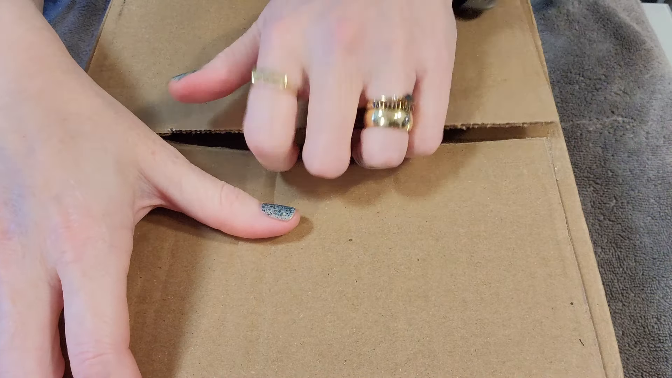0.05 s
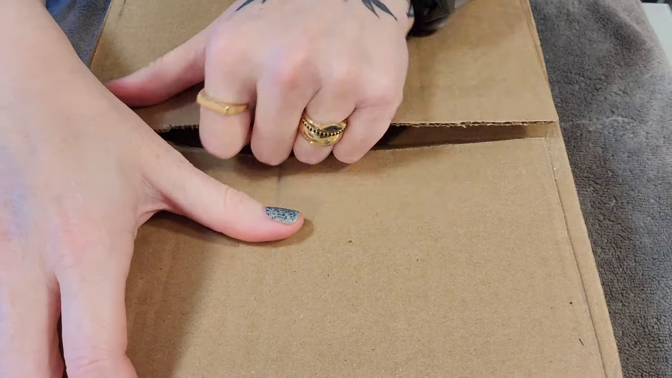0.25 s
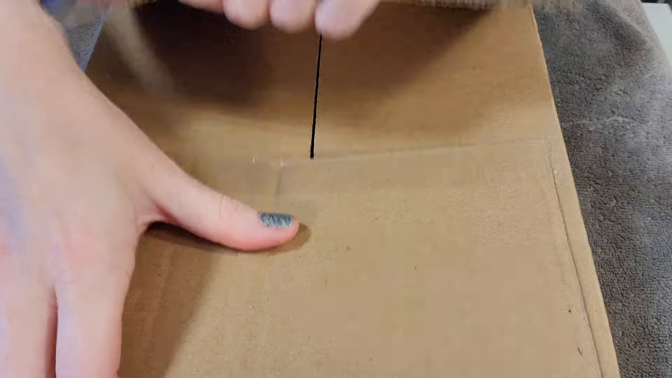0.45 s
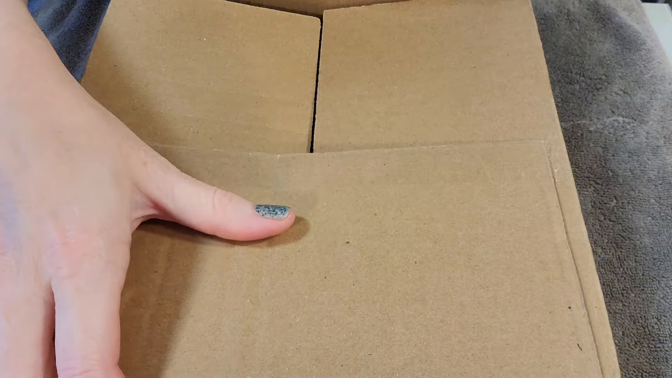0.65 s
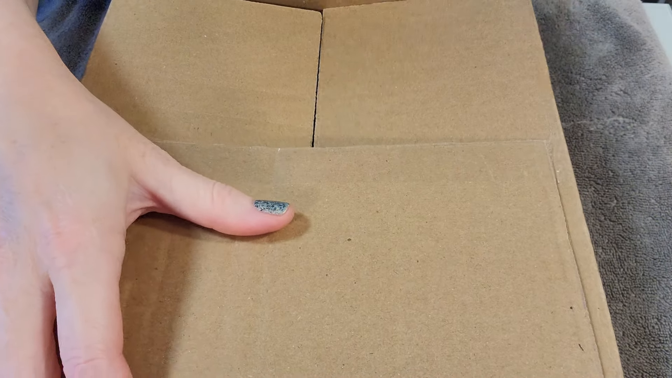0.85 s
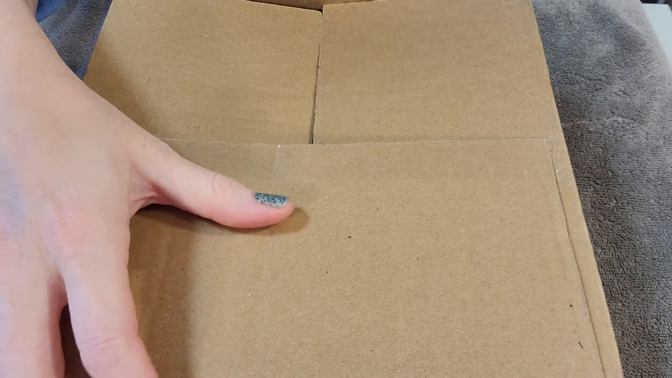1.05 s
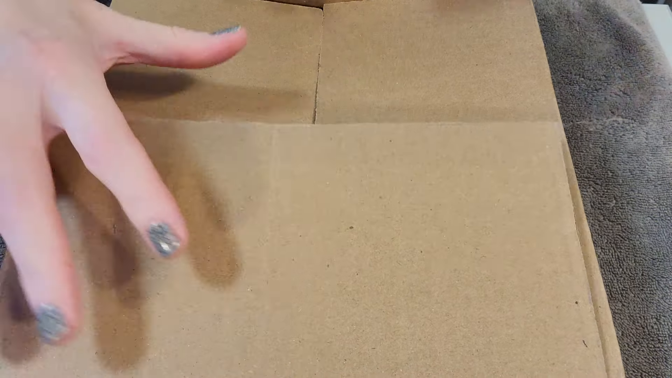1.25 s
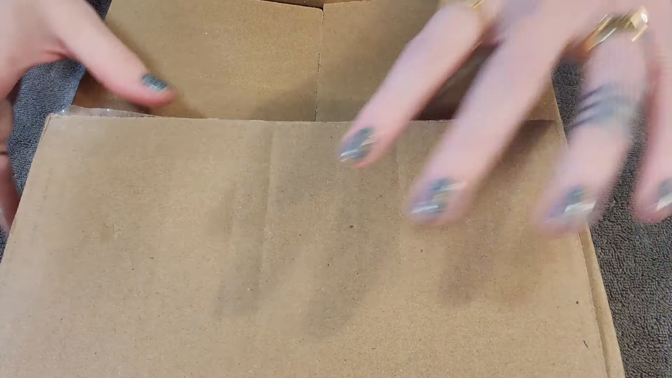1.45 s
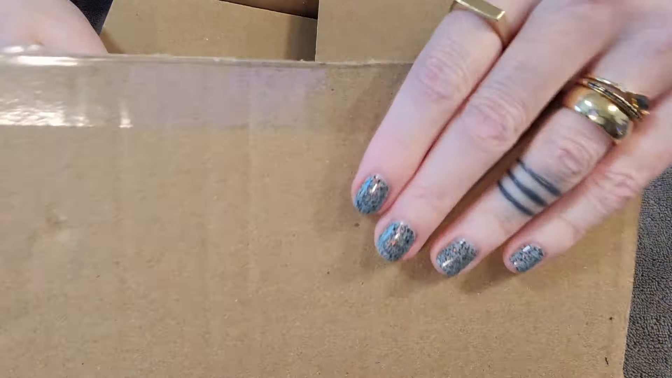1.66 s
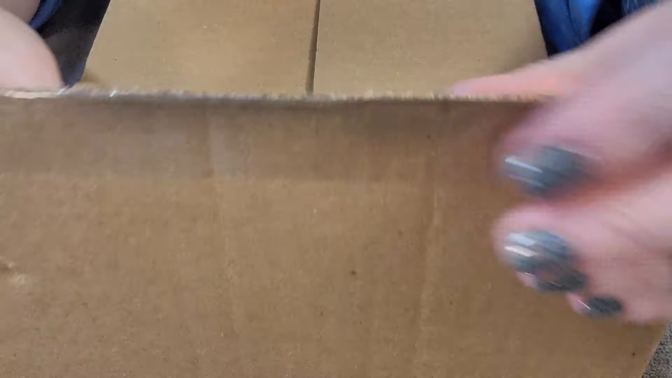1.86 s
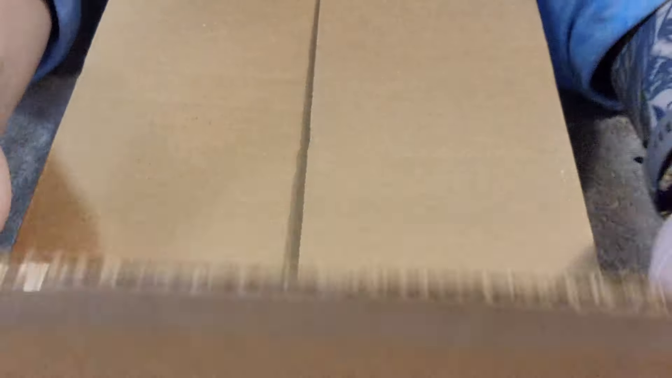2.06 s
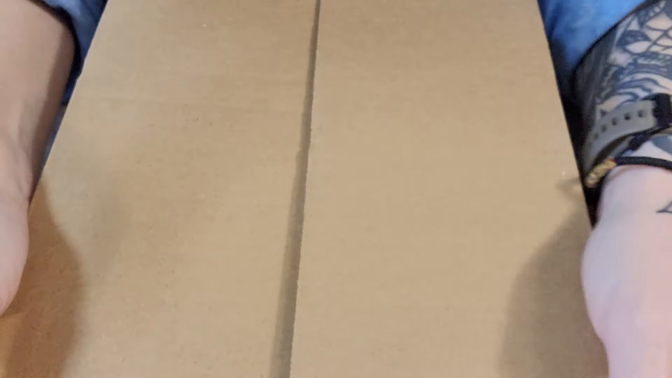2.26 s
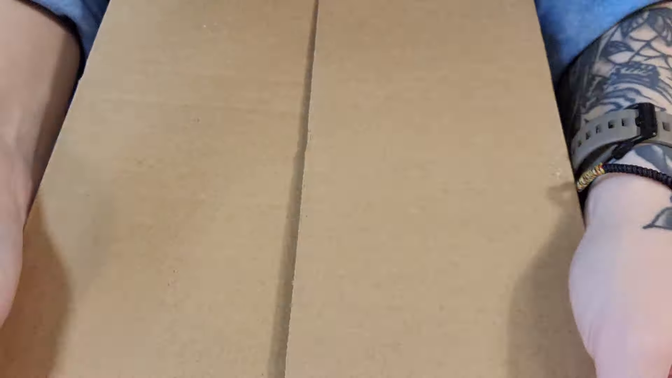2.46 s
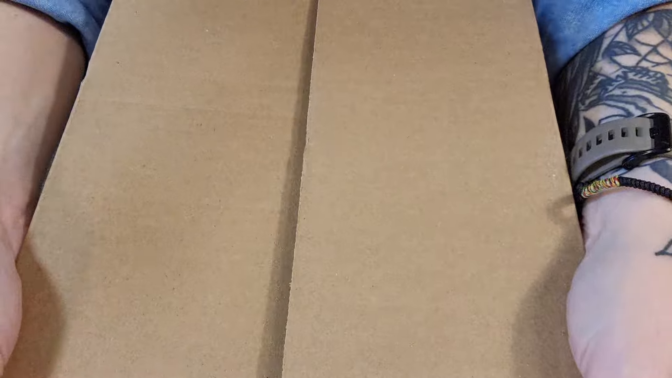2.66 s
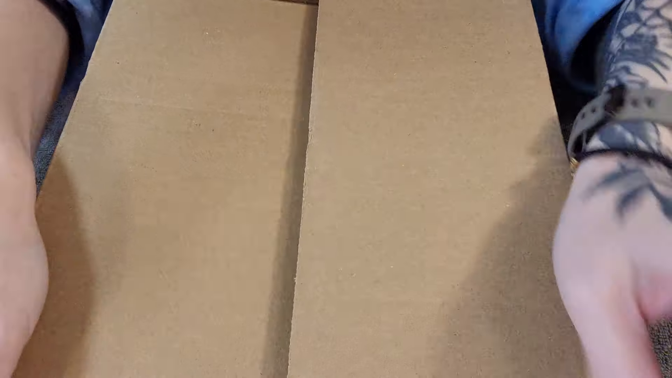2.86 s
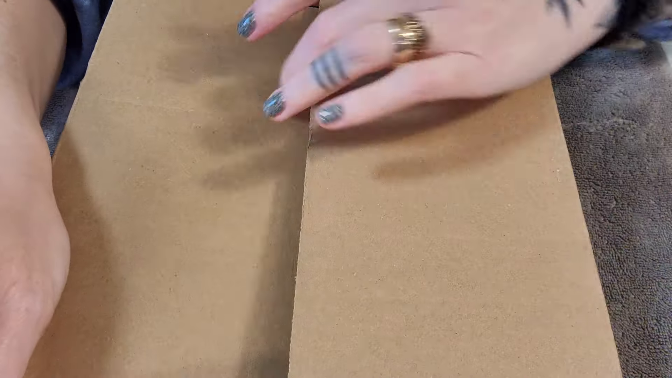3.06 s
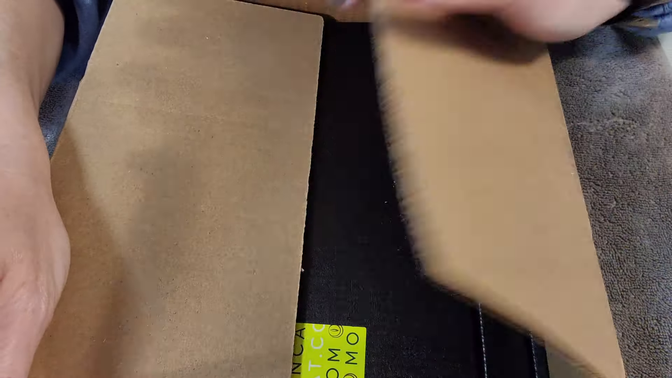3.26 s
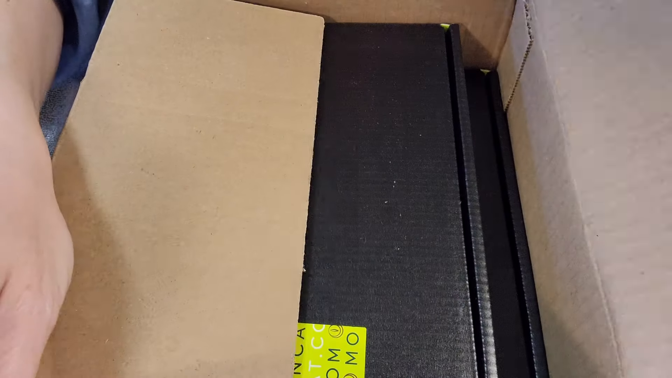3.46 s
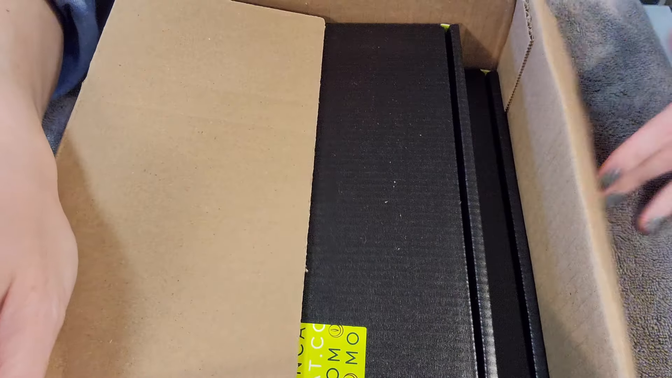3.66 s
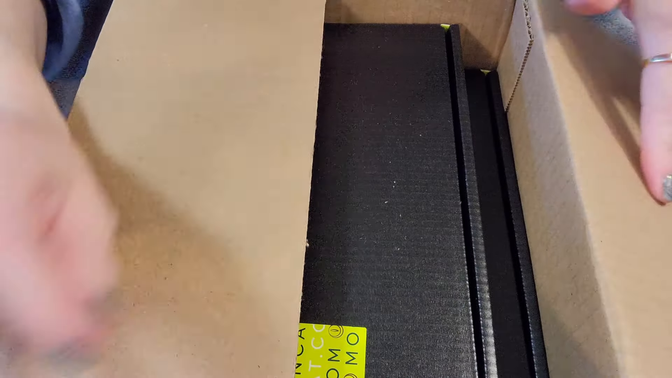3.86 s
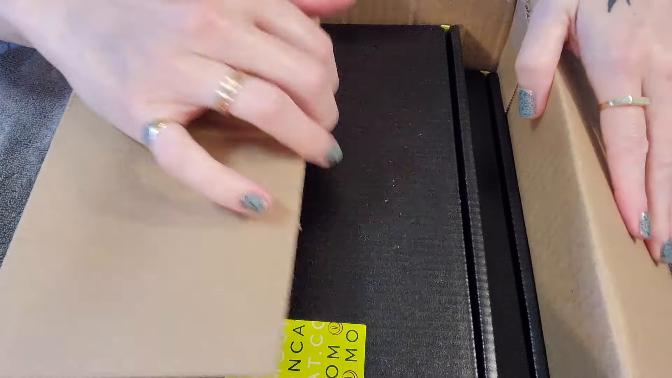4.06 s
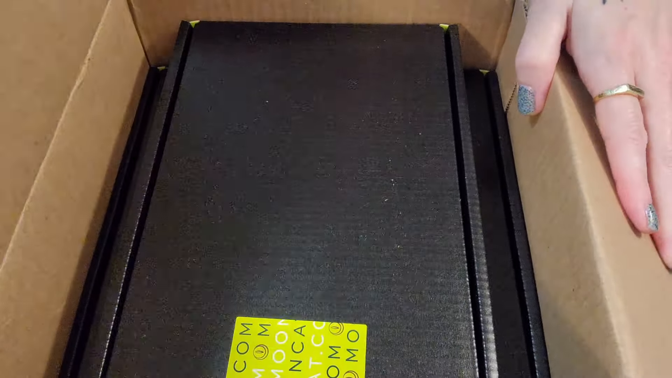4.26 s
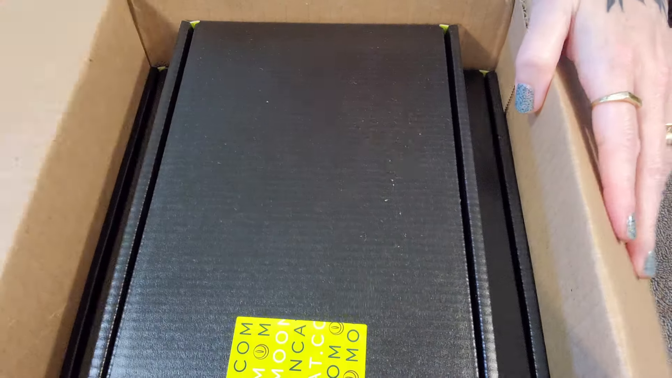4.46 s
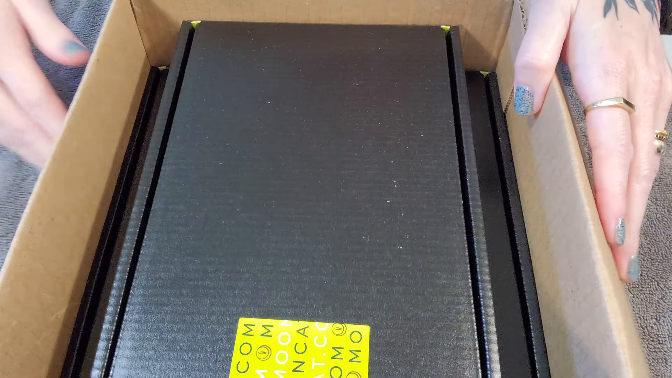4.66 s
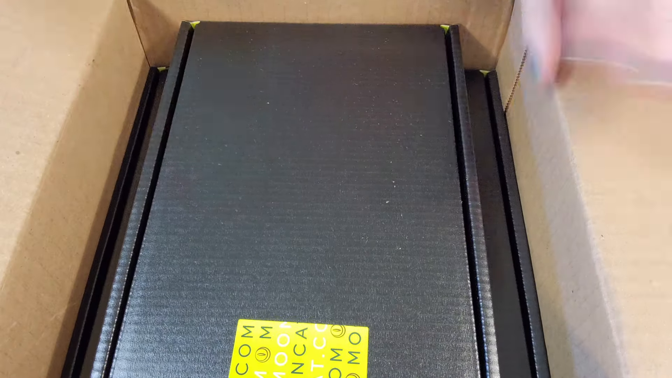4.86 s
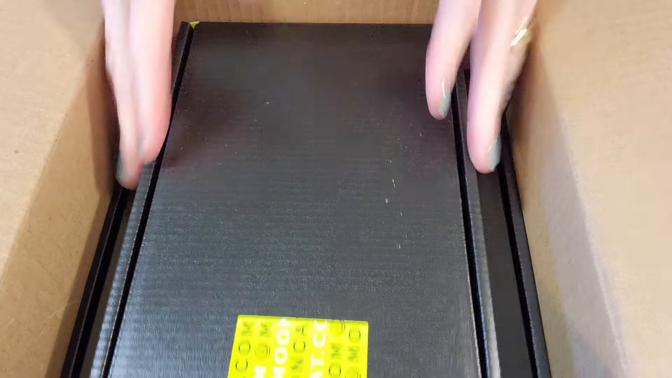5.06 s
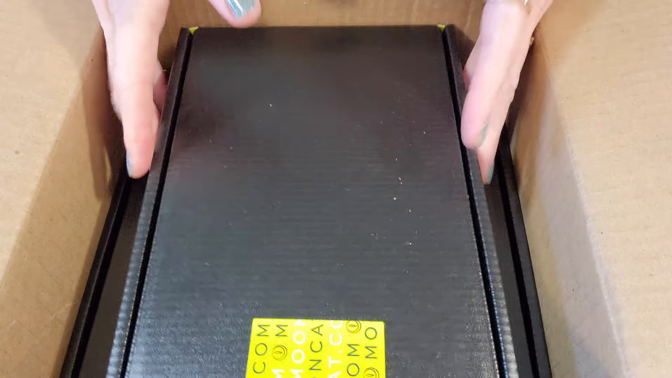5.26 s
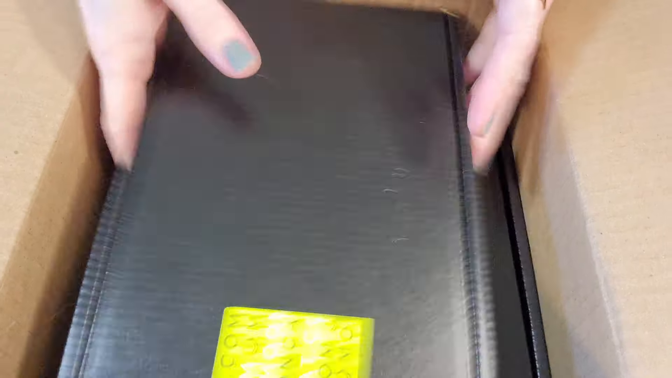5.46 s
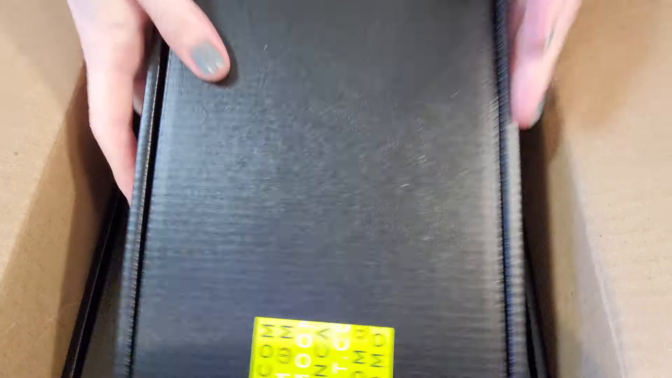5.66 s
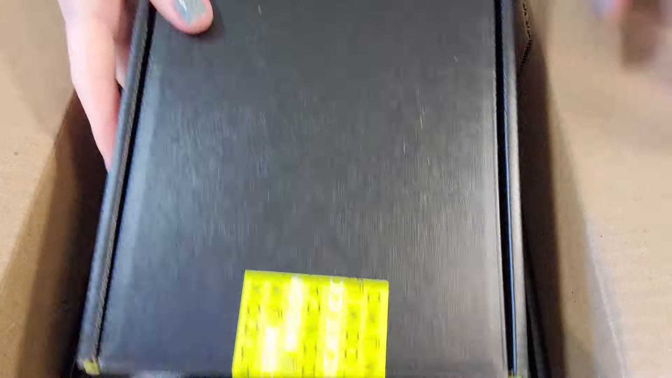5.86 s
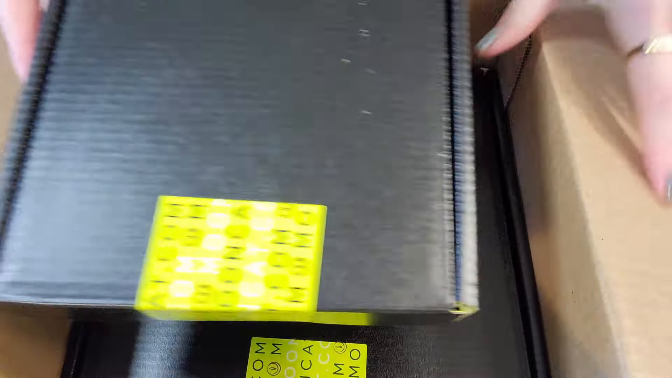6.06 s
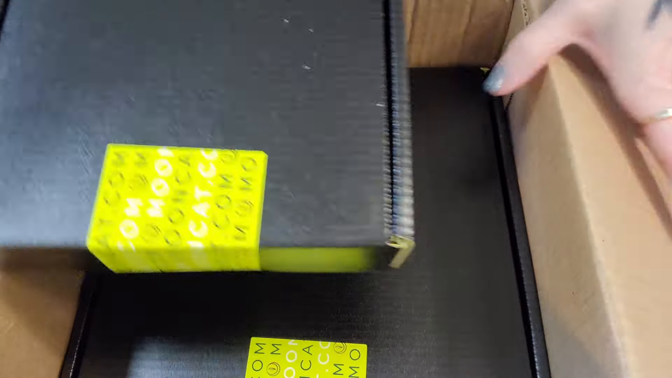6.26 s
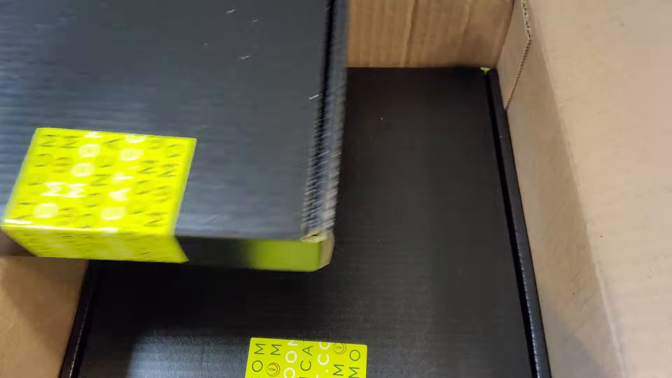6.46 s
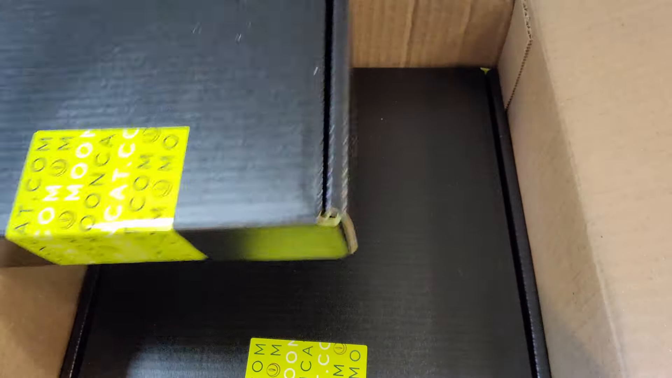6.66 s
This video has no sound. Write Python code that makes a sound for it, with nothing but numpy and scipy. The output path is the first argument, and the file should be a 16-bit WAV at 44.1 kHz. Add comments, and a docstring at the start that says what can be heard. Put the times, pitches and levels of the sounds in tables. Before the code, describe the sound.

Hands open a corrugated cardboard box close to the microphone in a small room. After a light knock, a sharp fibrous rip bursts out early, followed by two hollow thumps. Flaps hiss, rub and snap, fingertips squeak faintly, then dull knocks and scrapes grow busier until a smaller box bumps low and judders as it is drawn out.

```python
"""In a small room, hands open a corrugated cardboard box close to the microphone.
The lid rips free in bursts of parting fibres; panels flex, knock and snap as damped resonances.
Palms and paper rub by stick-slip friction, fingertips squeak, smooth faces hiss past,
and a smaller inner box is bumped and juddered out over the rim.
The held box rumbles below, and diffuse reflections surround everything but that rumble."""
import sys
import numpy as np
from scipy import signal
from scipy.fft import rfft, irfft
from scipy.io import wavfile
from scipy.ndimage import uniform_filter1d, map_coordinates

SR = 44100
rng = np.random.default_rng(int(sys.argv[2]) if len(sys.argv) > 2 else 0)


def generate_wav(signal):
    """Clip the signal to [-1, 1] and save it as 16-bit WAV at the path in sys.argv[1]."""
    frames = np.transpose(np.atleast_2d(signal))
    scaled = np.clip(frames, -1, 1) * 32767
    pcm = np.round(scaled).astype(np.int16)
    wavfile.write(sys.argv[1], SR, pcm)


N = 295470
T = np.arange(N) / SR  # time in seconds


def undb(db):
    """Logarithmic level: decibels to amplitude gain."""
    return 10 ** (np.asarray(db) / 20)


def unit(x):
    """Normalization: scale to rms 1."""
    return x / np.sqrt(np.mean(x ** 2))


def together(gains):
    """Incoherent addition: unrelated movements add in power."""
    return np.sqrt(sum(g ** 2 for g in gains))


def add(out, s, x):
    """Superposition: mix x into out from s seconds on."""
    i = int(s * SR)
    out[i:i + len(x)] += x[:N - i]


def colour(x, points):
    """Spectral shaping: filter x by (Hz, relative dB) points, then scale to rms 1."""
    hz, db = np.transpose(points)
    f = np.maximum(np.fft.rfftfreq(len(x), 1 / SR), 1)
    gain = undb(np.interp(np.log(f), np.log(hz), db))
    return unit(irfft(rfft(x) * gain, len(x)))


def band(x, hz, width):
    """Simple resonance: a second-order peak with gain 1 at its centre."""
    hz = min(hz, SR * .45)
    b, a = signal.iirpeak(hz, hz / min(width, SR / 4), fs=SR)
    return signal.lfilter(b, a, x)


def ring(x, modes):
    """Modal superposition: x drives parallel resonances, each (Hz, width Hz, dB)."""
    return sum(undb(db) * band(x, hz, width) for hz, width, db in modes)


def dull(x, hz):
    """Contact smoothing: a broad, soft contact passes little above hz."""
    return signal.sosfilt(signal.butter(2, hz, fs=SR, output="sos"), x)


def walk(rate):
    """Random modulation: straight lines between about rate chance values a second, rms near 1."""
    k = int(SR / rate)
    steps = np.repeat(rng.standard_normal(N // k + 1), k)
    return unit(uniform_filter1d(steps, k))[:N]


def fibres(rate, spread_db):
    """Stick-slip: paper fibres catch and let go in about rate slips a second, a few larger."""
    size = undb(spread_db * np.minimum(rng.exponential(size=N), 4))
    slipping = rng.random(N) < rate / SR
    return unit(slipping * size * rng.choice([-1, 1], N))


def fade(t, t60):
    """Exponential decay: free decay by 60 dB in t60."""
    return np.exp(-np.log(1000) * t / t60)


def gesture(start, rise, hold, t60):
    """Movement envelope: linear attack, hold and free decay, all in seconds."""
    t = T - start
    return np.clip(t / rise, 0, 1) * fade(np.maximum(t - rise - hold, 0), t60)


def swell(middle, half):
    """Stroke envelope: a short rise and fall with a broad top and quick edges."""
    return np.exp(-np.minimum(np.abs((T - middle) / half) ** 2.5, 20))


def snap(hz, q, crush_t60, crush):
    """Impact excitation: a contact and decaying crushing noise through a broad resonance; peak 1."""
    t = T[:SR // 10]
    push = crush * rng.standard_normal(len(t)) * fade(t, crush_t60)
    push[0] += 1  # the contact itself
    x = band(band(push, hz, hz / q), hz, 2 * hz)
    return x / np.abs(x).max()


def flex(hz):
    """Damped bending: corrugated board is dead, so each mode lasts only a few cycles."""
    turns = hz * T[:SR // 5]
    modes = [(1, 1), (1.7, -.5)]  # frequency ratio, gain
    return sum(gain * np.sin(2 * np.pi * ratio * turns) * fade(ratio * turns, 8) for ratio, gain in modes)


# The lid tearing free: a first crack, a thin peel, the glue giving way, the main run.
# Each row: start in seconds, hold in seconds, die-away t60 in seconds, level in dB, treble tilt in dB.
LID_RIPS = [(0.374, 0.00074, 0.022, -18, 8.5), (0.382, 0.038, .05, -44.5, 12.5),
            (0.4361, 0.0017, 0.009, -19.5, 8), (0.4416, 0.012, 0.27, -16, 1)]
# Colour of the tearing fibres. Each row: frequency in Hz, relative level in dB.
TEAR_COLOUR = [(90, -17.5), (400, -3.5), (1000, -2.5), (1900, -10), (2500, -18), (6300, -19), (16000, -37)]
# Resonances of the outer box. Each row: frequency in Hz, width in Hz, gain in dB.
OUTER_MODES = [(564, 8.7, 10.5), (980, 11, -14), (1415, 12, 2), (1850, 34, 5), (3880, 33, 0),
               (5740, 208, -12)]
RIP_RISE_S = 0.00037


def rip():
    """Fracture: glued fibres part in fast runs, bright at first, then shaking the whole lid."""
    run = fibres(rate=6000, spread_db=4.0)
    run = colour(run + undb(-4.5) * ring(run, OUTER_MODES), TEAR_COLOUR)
    low = signal.sosfiltfilt(signal.butter(2, 2200, fs=SR, output="sos"), run)
    high = run - low
    tear = np.zeros(N)
    for s, hold, t60, db, tilt_db in LID_RIPS:
        tilted = low * undb(-tilt_db) + high * undb(tilt_db)
        tear += gesture(s, RIP_RISE_S, hold, t60) * undb(db) * tilted
    return tear


# Blows on the panels. Each row: start in seconds, flex frequency in Hz, flex level in dB,
# slap frequency in Hz, slap level in dB before dulling, edge click level in dB.
PANEL_BLOWS = [(0.0194, 246, -15.5, 1070, -21.5, -18.5), (0.716, 337, -12.5, 575, -25, -42),
               (0.724, 410, -9.5, 880, -21.5, -50), (1.18, 328, -31, 640, -22.5, -32),
               (1.581, 165, -26.5, 1250, -26, -22.5), (1.588, 187, -16, 1020, -14, -23),
               (1.868, 227, -24, 1170, -29.5, -34), (2.585, 195, -30, 550, -27, -47),
               (2.637, 153, -25, 520, -28, -37), (2.6652, 179, -24, 580, -18, -24),
               (2.763, 179, -26, 660, -32.5, -43), (2.989, 304, -26, 570, -25, -36.5),
               (3.1247, 242, -16, 942.5, -22.5, -27.5), (3.1893, 362, -10.5, 1010, -18.5, -20),
               (3.899, 116, -29.5, 796, -18, -26), (4.053, 160, -18.5, 900, -29.5, -29),
               (4.063, 198, -15, 670, -30, -23), (4.3465, 84, -22, 484, -18, -16),
               (4.655, 218, -17.5, 396, -26, -31), (5.107, 525, -15.5, 1060, -9.5, -15),
               (5.248, 193, -33.5, 600, -27, -39), (5.319, 130, -25.5, 680, -27, -24.5),
               (5.511, 210, -16, 616, -20.5, -35), (5.534, 230, -15.5, 690, -9.5, -23),
               (5.651, 157, -31.5, 480, -29, -24.5), (5.801, 197, -26, 806, -25.5, -37)]


def knocks():
    """Impact: a blow flexes a panel, slaps its face and clicks its edge; returns flexing, contacts."""
    flexing, contacts = np.zeros(N), np.zeros(N)
    for s, flex_hz, flex_db, slap_hz, slap_db, click_db in PANEL_BLOWS:
        slap = dull(snap(slap_hz, q=2.15, crush_t60=0.069, crush=0.081), 2.7 * slap_hz)
        click = snap(hz=3650, q=0.9, crush_t60=0.0078, crush=0.18)
        add(flexing, s, undb(flex_db) * flex(flex_hz))
        add(contacts, s, undb(slap_db) * slap)
        add(contacts, s, undb(click_db) * click)
    return flexing, contacts


# Soft presses that only bend a panel.
# Each row: start in seconds, flex frequency in Hz, level in dB before the gradual onset.
PANEL_PRESSES = [(1.612, 177, -15.5), (2.069, 87, -29), (2.811, 217, -21), (3.106, 198, -20.5),
                 (3.197, 249, -11.5), (3.413, 80.6, -24), (4.35, 242, -11), (4.999, 110, -20),
                 (5.047, 79.6, -20.5), (5.517, 106, -16.5), (6.348, 73.5, -26.5)]
PRESS_BUILD_CYCLES = 0.59  # time constant of the onset


def presses():
    """Gradual forcing: a soft push takes about a cycle to get the panel moving."""
    out = np.zeros(N)
    for s, hz, db in PANEL_PRESSES:
        onset = 1 - np.exp(-hz * T[:SR // 5] / PRESS_BUILD_CYCLES)
        add(out, s, undb(db) * flex(hz) * onset)
    return out


# Nails and creases snapping. Each row: start in seconds, pitch in Hz, peak level in dB.
CREASE_TICKS = [(0.115, 8700, -26), (0.376, 4100, -17), (1.358, 1410, -37), (2.25, 9500, -33.5),
                (2.567, 1640, -33), (2.6564, 6800, -19), (2.6656, 2330, -15.5), (2.765, 2630, -31),
                (3.19, 6800, -19), (3.1941, 2450, -13.5), (3.1958, 2200, -17.5), (3.526, 5700, -29),
                (4.163, 8100, -26), (4.348, 1450, -13.5), (4.426, 2980, -21), (4.465, 1530, -28.5),
                (4.657, 7000, -18), (5.187, 2970, -25), (5.509, 3560, -22.5), (5.535, 2900, -17),
                (5.652, 2900, -23.5)]


def ticks():
    """Impulse response: small dry snaps of nails and creases, each with a short ring."""
    out = np.zeros(N)
    for s, hz, db in CREASE_TICKS:
        add(out, s, undb(db) * snap(hz, q=4.5, crush_t60=.014, crush=.4))
    return out


# Palms and flaps rubbing, one row a movement. Each row: start in seconds, speeding up in seconds,
# steady motion in seconds, board drive in dB, surface hiss drive in dB.
RUB_MOVES = [(0.014, 0.0044, 0.11, -38.5, -47.5), (0.211, 0.0067, 0.098, -60, -51),
             (0.93, 0.25, 0.087, -46.5, -59.5), (1.525, 0.012, 0.088, -46.5, -53),
             (1.732, 0.11, 0.04, -48.5, -48), (2.18, 0.092, 0.46, -50.5, -57),
             (2.499, 0.063, 0.32, -45.5, -50), (3.107, 0.065, 0.024, -45, -46.5),
             (3.521, 0.0037, 0.24, -54.5, -53), (3.95, 0.092, 0.22, -49.5, -53),
             (4.347, 0.02, 0.44, -49.5, -49.5), (4.64, 0.025, 0.1, -46.5, -51),
             (4.77, 0.11, 0.015, -50.5, -49), (5.095, 0.0075, 0.085, -40.5, -47),
             (5.25, 0.01, 0.29, -44.5, -51.5), (5.48, 0.022, 0.25, -44, -52),
             (5.876, 0.011, 0.15, -72, -59), (6.072, 0.078, 0.017, -81, -46), (6.19, 0.024, 0.16, -50, -52),
             (6.35, 0.026, 0.3, -46.5, -56.5)]
RUB_STOP_T60_S = 0.33  # a movement coasts to rest


def hand_work():
    """Frictional drive: how strongly the moving hands drive the board, and how strongly its surface."""
    board, hiss = [], []
    for s, rise, hold, board_db, hiss_db in RUB_MOVES:
        move = gesture(s, rise, hold, RUB_STOP_T60_S)
        board.append(move * undb(board_db))
        hiss.append(move * undb(hiss_db))
    return together(board), together(hiss)


def under_hand(x):
    """Comb filtering: sound bounces between palm and board; the changing gap moves its bands."""
    lag = .0016 * np.exp(.14 * walk(5))  # seconds
    bounce = .38
    echoes = sum((-bounce) ** k * np.interp(T - k * lag, T, x) for k in range(3))
    return echoes * np.sqrt(1 - bounce ** 2)


# Short strokes of fingers and flap edges. Each row: middle in seconds, half length in seconds,
# rasp frequency in Hz, rasp drive in dB, hiss drive in dB.
STROKES = [(0.052, 0.015, 1350, -39.5, -55), (0.166, 0.024, 334, -59, -44),
           (0.952, 0.017, 660, -45.5, -44.5), (1.016, 0.016, 543, -42.5, -44.5),
           (1.048, 0.0061, 1020, -46, -50), (1.124, 0.025, 900, -40, -45), (1.221, 0.012, 1040, -44, -52),
           (1.611, 0.011, 600, -28, -43.5), (1.882, 0.015, 420, -43.5, -50),
           (2.058, 0.022, 1080, -48, -41.5), (2.339, 0.016, 302, -43.5, -57.5),
           (2.669, 0.029, 486, -35, -44.5), (2.848, 0.013, 890, -44.5, -49.5),
           (3.011, 0.024, 536, -39.5, -58.5), (3.156, 0.0073, 1260, -39, -35),
           (3.19, 0.0077, 1240, -38, -30.5), (3.716, 0.015, 680, -46.5, -52.5),
           (3.882, 0.037, 850, -67, -43.5), (4.006, 0.012, 500, -44.5, -51.5),
           (4.662, 0.015, 405, -31.5, -28.5), (4.751, 0.018, 1310, -47, -35),
           (5.197, 0.022, 764, -57, -41.5), (5.499, 0.025, 655, -34.5, -38),
           (6.405, 0.024, 670, -49, -44.5)]
# Colour of the rasping board. Each row: frequency in Hz, relative level in dB.
BOARD_COLOUR = [(100, 1.5), (260, 1.5), (750, -2.5), (2800, -13), (16000, -59)]
# Colour of the hissing surface. Each row: frequency in Hz, relative level in dB.
HISS_COLOUR = [(500, 8), (2000, 3.5), (7500, 7), (16000, -1.5)]
REST_BOARD_DB, REST_HISS_DB = -69.5, -69.5  # drive from hands lying on the box, never quite still


def rubbing(board, hiss):
    """Stick-slip friction: the surface hisses and the board below it rasps in separate grains."""
    board = together([board, undb(REST_BOARD_DB)])
    hiss = together([hiss, undb(REST_HISS_DB)])
    grains = fibres(rate=1100, spread_db=3.9)
    grip = walk(40)  # pressure comes and goes under the moving hand
    rasp = board * colour(grains, BOARD_COLOUR) * undb(2.53 * grip)
    slips = fibres(rate=1100, spread_db=4)
    for s, half, hz, rasp_db, hiss_db in STROKES:
        # a stroke wakes two broad resonances of the patch that it crosses
        stroke = swell(s, half)
        pair = band(slips, hz, hz / 3) - band(slips, 2.46 * hz, hz / 2) / 3
        patch = band(pair, hz, 3 * hz)
        rasp = rasp + undb(rasp_db) * stroke * unit(patch)
        hiss = hiss + undb(hiss_db) * stroke
    # the stroke slips also tick in the treble
    fizz = colour(fibres(rate=14000, spread_db=0.5) + 0.66 * slips, HISS_COLOUR)
    return under_hand(rasp) + hiss * fizz * undb(2 * grip + 2 * walk(130))


# Smooth faces of lid and flaps gliding past the microphone. Each row: start in seconds,
# speeding up in seconds, steady motion in seconds, level in dB before the unevenness.
FACE_GLIDES = [(0.735, 0.04, 0.15, -57), (1.775, 0.2, 0.22, -43), (2.85, 0.04, 0.035, -47),
               (3.33, 0.07, 0.04, -66)]
# Colour of the airy hiss. Each row: frequency in Hz, relative level in dB.
AIR_COLOUR = [(3000, -3.5), (9000, 1.5), (13000, 1), (16000, -3)]
GLIDE_STOP_T60_S = 0.26


def glide():
    """Fine-grained friction: smooth liner paper barely catches, an uneven airy hiss without rasp."""
    speed = together(gesture(s, rise, hold, GLIDE_STOP_T60_S) * undb(db) for s, rise, hold, db in FACE_GLIDES)
    return colour(fibres(rate=9000, spread_db=1.0), AIR_COLOUR) * speed * undb(walk(70))


DIPS_S, DIP_HALF_S, DIP_DB = [1.92, 2], 0.02, -8.5  # middles, half length, depth


def dips():
    """Gain reduction: the rubbing and gliding briefly drop in level, twice."""
    return undb(DIP_DB * sum(swell(s, DIP_HALF_S) for s in DIPS_S))


# Fingertips dragging along the board with a breathy squeak. Each row: start in seconds, speeding up
# in seconds, steady motion in seconds, starting pitch in Hz, glide in octaves per second, level in dB.
FINGER_DRAGS = [(1.93, 0.092, 0.26, 1090, 1, -56.5), (2.878, 0.015, 0.0095, 1255, 1.3, -46.5),
                (4.739, .13, 0.044, 1610, 1, -46), (5.652, 0.0027, 0.08, 3200, -4.5, -47.5)]
# Bands of the squeak. Each row: ratio to the pitch, gain in dB.
SQUEAK_MODES = [(1, 2), (1.82, -6.5), (2.6, -16)]
DRAG_Q, DRAG_WOBBLE_OCT, DRAG_STOP_T60_S = 8.5, .035, 0.17


def drags():
    """Driven resonance: a fingertip sings in rough wavering bands that glide up or down at a set rate."""
    out = np.zeros(N)
    for s, rise, hold, hz, oct_per_s, db in FINGER_DRAGS:
        friction = fibres(rate=3000, spread_db=3)
        modes = [(hz * ratio, hz / DRAG_Q, mode_db) for ratio, mode_db in SQUEAK_MODES]
        voice = unit(ring(friction, modes))
        octaves = oct_per_s * np.clip(T - s, 0, rise + hold) + DRAG_WOBBLE_OCT * walk(30)
        # reading the voice faster or slower bends its pitch
        bent = map_coordinates(voice, [np.cumsum(2 ** octaves)], mode="mirror")
        out += bent * gesture(s, rise, hold, DRAG_STOP_T60_S) * undb(db)
    return out


def inner_bump():
    """Modal excitation: a soft bump rings one low mode of the inner box."""
    out, t = np.zeros(N), T[:SR // 3]
    envelope = fade(t, 0.074) - fade(t, 0.014)
    add(out, 6.2005, undb(-11.5) * np.sin(2 * np.pi * 246 * t) * envelope)
    return out


# The inner box dragging over the rim. Each row: start in seconds, speeding up in seconds,
# steady motion in seconds, level in dB.
RIM_SLIDES = [(6.39, 0.024, 0.026, -46.5), (6.467, 0.017, 0.035, -33.5), (6.616, 0.014, 0.028, -45)]
# Resonances of the inner box. Each row: frequency in Hz, width in Hz, gain in dB.
INNER_MODES = [(256.5, 11, 4), (527, 41, -3), (1246, 155, -13), (1780, 130, -15.5), (2660, 70, -22),
               (5160, 210, -26.5)]
SLIDE_STOP_T60_S = 0.25


def inner_slide():
    """Stick-slip into modes: the inner box's underside judders over the rim in a few coarse pulls."""
    pull = together(gesture(s, rise, hold, SLIDE_STOP_T60_S) * undb(db) for s, rise, hold, db in RIM_SLIDES)
    judder = fibres(rate=1100, spread_db=1.5) * undb(walk(90))
    return unit(ring(judder, INNER_MODES)) * pull


# Colour of the panel rumble. Each row: frequency in Hz, relative level in dB.
RUMBLE_COLOUR = [(20, -13.5), (70, 7.5), (180, -6.5), (800, -71)]
SWAY_REST_DB, SWAY_PUSH_DB = -54, -3  # drive from the held box, and share of the rubbing drive


def sway(board):
    """Forced vibration: soft pushes make the big panels rumble, more so the harder the hands rub."""
    pushes = fibres(rate=300, spread_db=2)
    drive = together([undb(SWAY_REST_DB), undb(SWAY_PUSH_DB) * board])
    return colour(pushes, RUMBLE_COLOUR) * drive * undb(walk(60))


# Reverberation of the small room. Each row: frequency in Hz, t60 in seconds.
ROOM_DECAY = [(200, 0.35), (4000, 0.37), (14000, 0.29)]


def room(x):
    """Reverberation: diffuse reflections, about octave by octave, through a tail of unit energy."""
    t, (hz, t60) = T[:SR // 2], np.transpose(ROOM_DECAY)
    tail = np.zeros(len(t))
    for f in np.geomspace(60, 15000, 9):
        decay = fade(t, np.interp(np.log(f), np.log(hz), t60))
        tail += band(rng.standard_normal(len(t)), f, f / 2) * decay
    tail *= np.clip((t - .003) / 0.006, 0, 1)  # reflections begin after 3 ms
    return signal.fftconvolve(x, tail / np.sqrt(np.sum(tail ** 2)))[:N]


def scene():
    """Direct and reverberant sound: all near sources plus the room, which the tear feeds the most."""
    tear, (flexing, contacts), (board, hiss) = rip(), knocks(), hand_work()
    thuds = flexing + presses() + inner_bump()
    snaps = ticks()
    rustle = (rubbing(board, hiss) + glide()) * dips()
    handling = rustle + drags() + inner_slide()
    far = undb(-7) * tear + undb(-8.5) * contacts + undb(-11.0) * snaps
    far = far + undb(-10.5) * thuds + undb(-11.5) * handling
    near = tear + thuds + contacts + snaps + handling + sway(board)
    return (near + room(far))[None]


TOP_HZ = 16100


def record(dry):
    """Saturation and band limiting: the recorder rounds the loudest peaks and cuts the top."""
    ceiling = .7
    rounded = ceiling * np.tanh(dry / ceiling)
    return signal.sosfilt(signal.ellip(8, .2, 70, TOP_HZ, fs=SR, output="sos"), rounded)


dry = scene()
out = record(dry)
generate_wav(out)
```